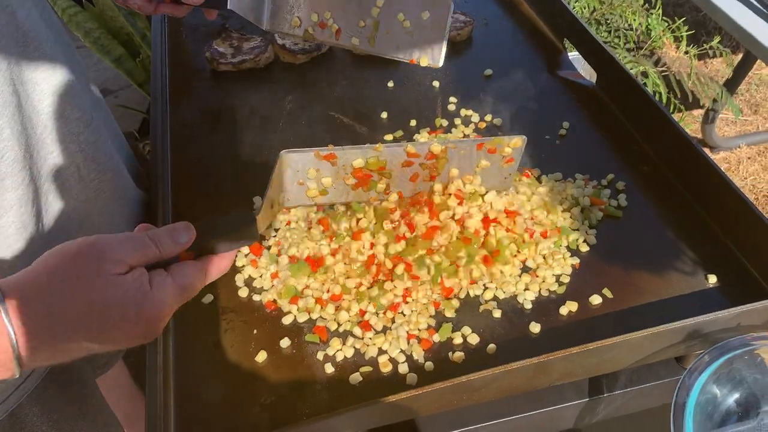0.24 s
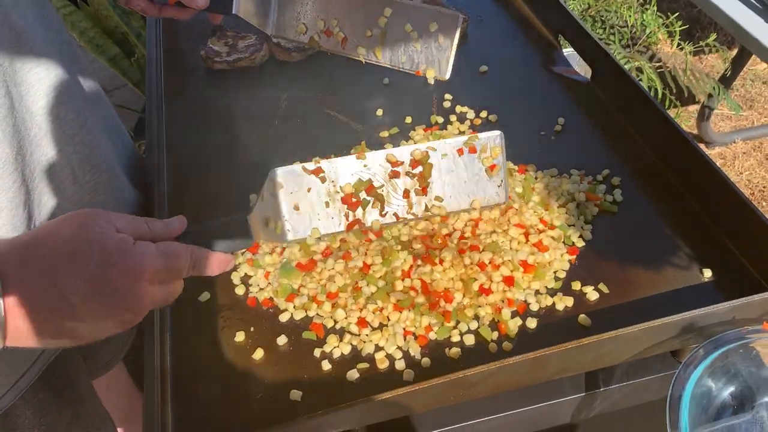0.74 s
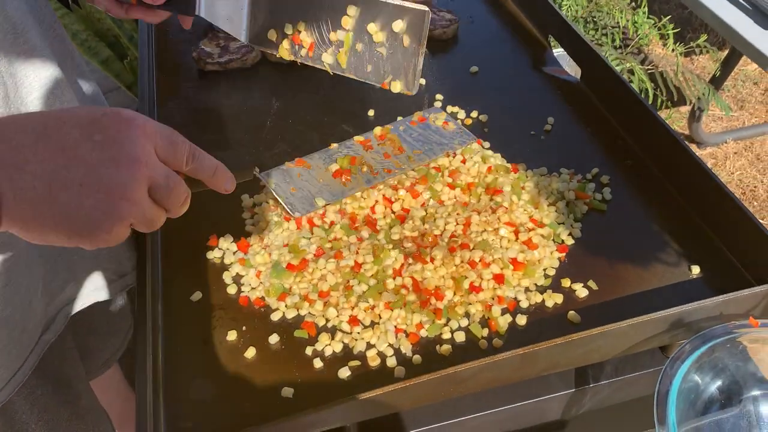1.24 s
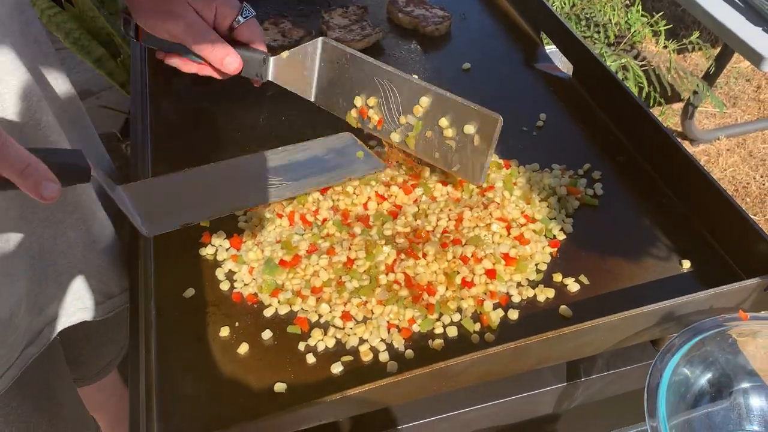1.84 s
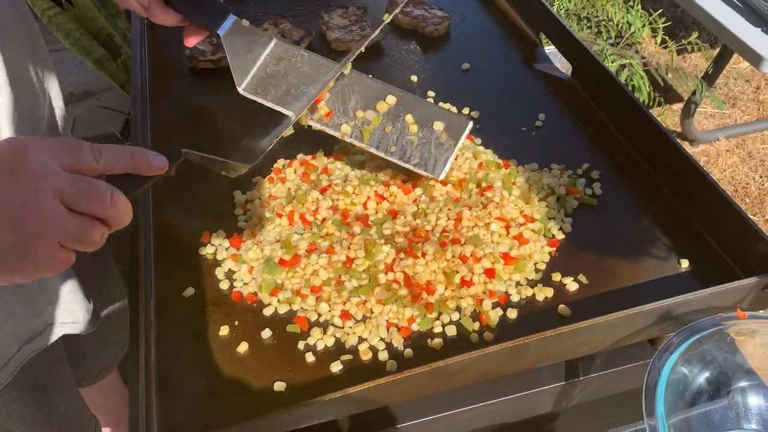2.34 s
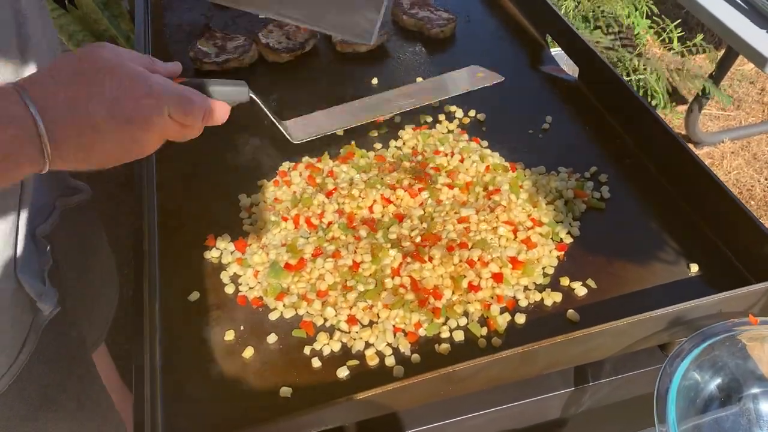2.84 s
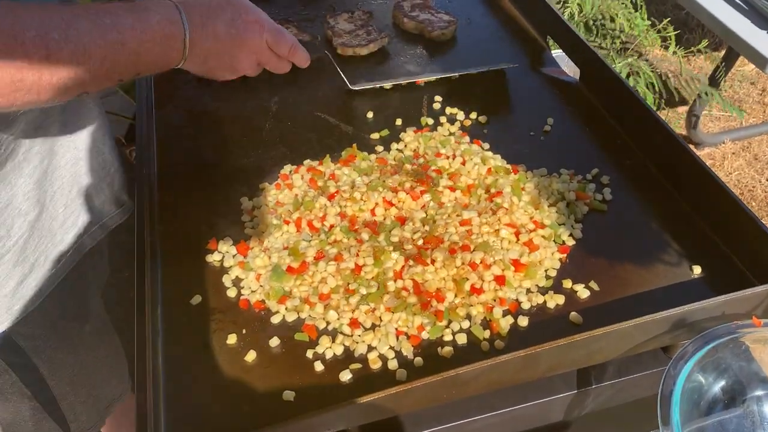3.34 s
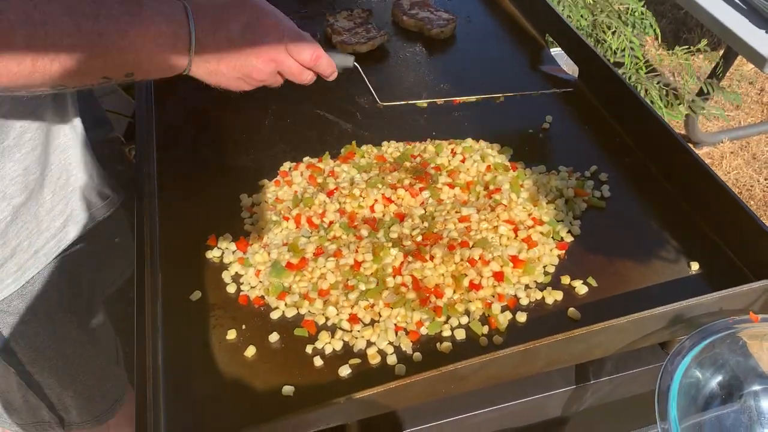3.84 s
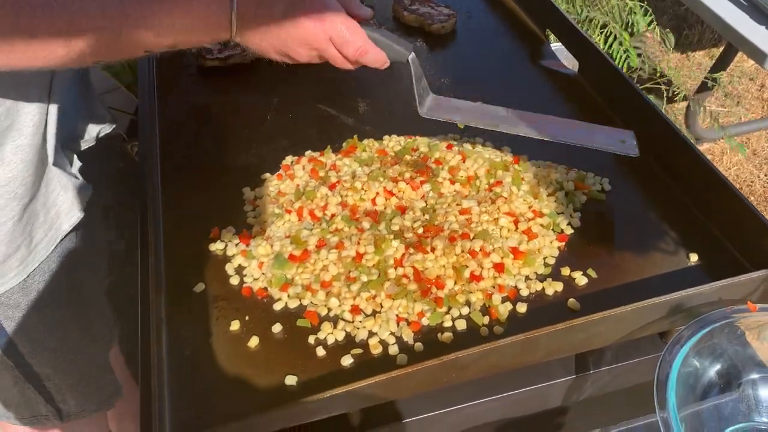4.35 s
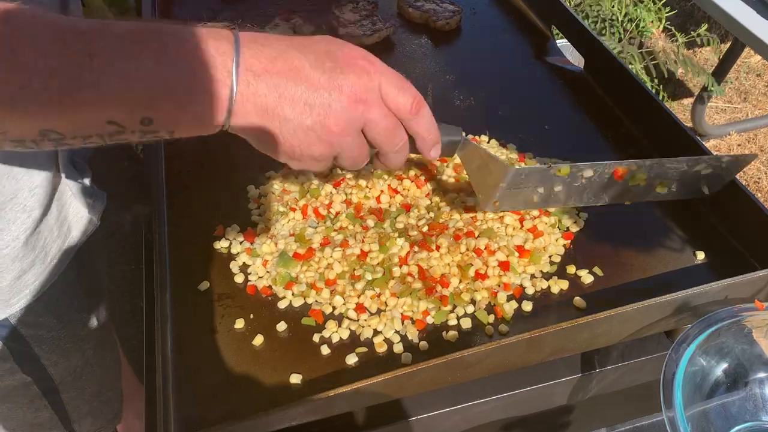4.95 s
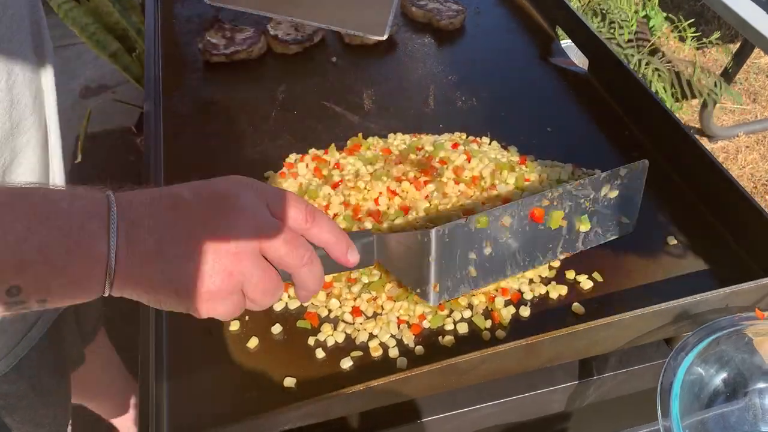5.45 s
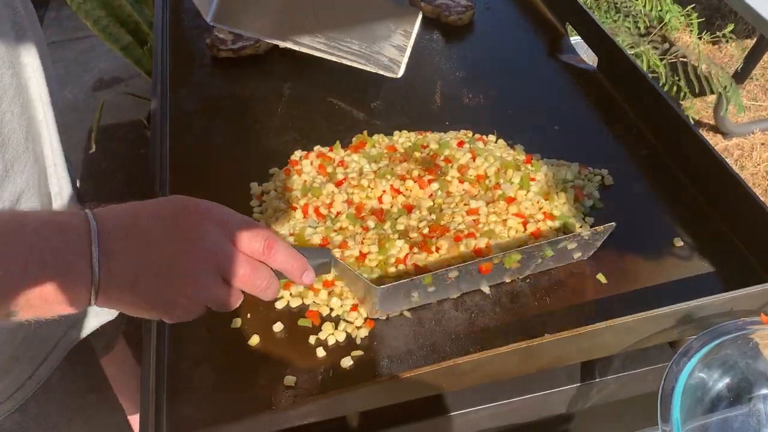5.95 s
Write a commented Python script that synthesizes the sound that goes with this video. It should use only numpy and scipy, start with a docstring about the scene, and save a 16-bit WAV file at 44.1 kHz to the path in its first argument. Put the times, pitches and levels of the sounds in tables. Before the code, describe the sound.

Metal spatulas knock and scrape across a hot steel griddle over a crackling sizzle, with bursts of wind rumble on the microphone.

```python
"""A steady sizzle, with spits of fat: diced vegetables fry on an outdoor steel griddle.
Bursting steam bubbles make the hiss and crackle. Steel spatulas knock and scrape across the plate:
each stroke lands with a clank, drags with a gritty hiss and rings on as the blade lifts.
Gusts of wind buffet the small stereo microphone with rumble, flutter and thumps."""
import sys
import numpy as np
from scipy import signal
from scipy.fft import rfft, irfft, next_fast_len
from scipy.io import wavfile
from scipy.ndimage import uniform_filter1d, minimum_filter1d

SR = 44100
rng = np.random.default_rng(int(sys.argv[2]) if len(sys.argv) > 2 else 0)


def to_wav(s):
    """Save 16-bit WAV."""
    ch = np.atleast_2d(s).T  # columns
    pcm = np.round(np.clip(ch, -1, 1) * 32767)  # PCM
    wavfile.write(sys.argv[1], SR, pcm.astype(np.int16))


N = 273751

# Each row: time in seconds, level in dB, extra treble in dB.
FRYING_LEVEL = [(0, -25.5, 0.5), (.2, -24.5, -0.5), (.29, -23, 4.5), (.42, -24, 1), (.64, -24.5, 1.5),
                (.75, -27, -1), (1.48, -28, -0.5), (1.68, -27, -2.5), (2.8, -28, -1), (3.3, -26.5, -1),
                (3.7, -29.5, 0.5), (4.1, -23, -7), (4.3, -27, -9), (4.82, -29.5, -2.5), (5.36, -29, -7),
                (6.21, -29.5, -5)]
# Each row: frequency in Hz, spectral density in dB.
FRYING_SPECTRUM = [(290, -11.5), (500, -21), (868, -13.5), (1190, -9), (1770, -14.5), (1950, -10),
                   (3750, -9), (4150, -9.5), (4660, -8), (5470, -8), (8330, -3.5), (14500, -2), (16000, 0)]
# Each row: frequency in Hz, left-right correlation.
FRYING_CORRELATION = [(60, 0.95), (130, 0.59), (290, 1), (640, 0.81), (1410, 0.74), (3100, 0.31),
                      (6820, 0.1), (10000, 0.95), (15000, 0.62)]
# Each row: frequency in Hz, left over right in dB.
FRYING_PAN = [(60, -3), (110, -2), (200, -9), (380, 8), (700, -2), (1290, 1), (2380, 1), (4400, 1.5),
              (8120, 4), (15000, -1.5)]
def sizzle():
    """Countless steam bubbles burst into a flickering hiss; larger ones crackle."""
    crackles_per_s, crackle_db, calm_db = 600, -19.5, -27
    level_db, treble_db = curves(FRYING_LEVEL)
    hiss = stereo_noise(FRYING_CORRELATION) * gain_of(1.14 * wander(40) + 1.1 * wander(1300))
    bursts = gain_of(0.85 * np.minimum(rng.exponential(1, N), 6)) * (rng.random(N) < crackles_per_s / SR)
    crackle = evened(bursts * rng.choice([-1, 1], N)) * panned(5 * rng.standard_normal(N))
    fizz = coloured(hiss + gain_of(crackle_db) * crackle, FRYING_SPECTRUM)
    fizz = filtered(fizz, lambda hz: panned(value_at(FRYING_PAN, hz)))
    treble = signal.sosfilt(signal.butter(2, 5500, "high", fs=SR, output="sos"), fizz)
    sheen = signal.sosfiltfilt(signal.butter(2, [7950, 8700], "band", fs=SR, output="sos"), treble)
    sheen_db = -3 + 0.6 * (level_db - calm_db)
    treble = treble + (gain_of(sheen_db) - 1) * sheen
    return gain_of(level_db) * (fizz - treble) + gain_of(level_db + treble_db) * treble


# Each row: start in seconds, peak before panning and filtering in dB.
FAT_SPITS = [(0.2194, -15), (0.2862, -11), (0.3714, -14), (0.4344, -15), (0.5774, -13), (0.6324, -12),
             (0.9844, -16), (1.7074, -16), (3.2344, -22), (3.27, -13), (3.8694, -20), (6.0801, -19)]
def spitting_fat():
    """Fat spits in single sharp snaps, left of centre."""
    out, pan_db = np.zeros((2, N)), 5
    for start_s, db in FAT_SPITS:
        snap = rng.standard_normal(90) * np.exp(-np.arange(90) / 10)
        add(out, start_s, gain_of(db) * panned(pan_db) * snap / abs(snap).max())
    return coloured(out, FRYING_SPECTRUM)


STROKE_SAMPLES = 24576
# Each row: start in seconds, level in dB, rise in seconds, bass, rasp, treble and pan in dB, then the
# grip: three freely ringing pitches in Hz, their lift in dB, ring time as a multiple of the free blade's.
LANDINGS = [(1.508, -26.5, 0.0009, -3.5, 0, 9.5, 1, 2090, 5800, 8500, 7, 0.37),
            (1.5891, -18, 0.0018, -10.5, -5, -2, -0.5, 2166, 5260, 8170, 13, 0.59),
            (2.3207, -13, 0.0019, -7.5, 1, -4, 2, 2116, 4253, 6440, 7.4, 0.49),
            (3.2974, -14.5, 0.0021, -1, 2.5, -2, -0.5, 918.6, 1104, 7600, 15.4, 0.88),
            (4.0139, -14, 0.0063, 0, -14, -17, 1.5, 920, 2034, 4253, 12.7, 0.72),
            (4.5595, -11.5, 0.0018, -9, 0, -1, 1.5, 1880, 1200, 16000, 11.5, 0.83),
            (5.237, -6.5, 0.0023, -8, -8.5, -16, 0, 967, 2310, 3950, 7, 1),
            (5.7538, -12, .001, -8, -1, -3.5, 3, 1070, 2150, 8500, 3.7, 0.5)]
def spatula_clanks():
    """The blade lands with a tick and chatters briefly; it bounces once a moment later."""
    chatter_t60_s, bounce_db, bounce_s = 0.098, -20, 0.0177
    out, t = np.zeros((2, N)), np.arange(STROKE_SAMPLES) / SR
    for start_s, db, rise_s, bass_db, rasp_db, treble_db, pan_db, *grip in LANDINGS:
        tone_db = np.outer([bass_db, rasp_db, treble_db], np.ones(len(t)))
        blow = gain_of(db + 0.5 - 60 * t / chatter_t60_s) * np.minimum(t / rise_s, 1)
        bounce = gain_of(bounce_db) * np.interp(t - bounce_s, t, blow, left=0)
        force = (blow + bounce) * gain_of(1.32 * wander(88, len(t)))
        clank = blade_ring(force, tone_db, grip) + plate_grit(force, tone_db, grip)
        tick = np.diff(rng.standard_normal(401)) * np.exp(-t[:400] / 0.0049)
        add(out, start_s, clank * panned(pan_db))
        add(out, start_s, gain_of(db + treble_db + 2) * tick * panned(pan_db))
    return out


# Each row: time of greatest pressure, rise, hold and fall in seconds, level, bass, rasp, treble and pan
# in dB, the five grip values as in LANDINGS, ring on release in dB.
SCRAPES = [(1.699, 0.031, 0.016, 0.036, -43, -7, 0, 6, 2, 3000, 6050, 8400, 11, .67, -60),
           (1.78, 0.016, 0.043, 0.023, -36.5, -15, -7, 2.5, 1, 2950, 2300, 2674, 9.1, 0.92, -50),
           (1.854, 0.041, .03, 0.032, -43, -3.5, 8, 11, 2, 5240, 5860, 6200, 5.5, 1.2, -55),
           (2.519, 0.22, 0.095, 0.043, -32, -22, -1.5, 2.5, 1.5, 1948, 5230, 6400, 1.8, 1.3, -35.5),
           (3.46, 0.13, 0.041, 0.16, -23.5, -2, 2, 0, 0, 960, 1280, 5500, 2.8, 0.6, -45),
           (3.584, 0.074, 0.025, 0.1, -26.5, -3.5, -10, -2.5, -.5, 902, 1280, 1140, 3.3, 0.55, -39),
           (4.158, .07, 0.037, 0.13, -17.5, -10.5, 0.5, -4, 2.5, 950, 5500, 10400, 3.9, 0.95, -45),
           (4.645, .05, 0.044, 0.09, -28.5, -5, 0.5, -2.5, 1.5, 784, 1912, 10870, 14, 0.53, -26),
           (5.35, 0.084, 0.037, 0.074, -20.5, -5, -13, -9.5, 2, 938, 1116, 4253, 8.6, 0.72, -23),
           (5.92, .1, 0.024, 0.056, -34.5, 2, -5, -0.5, 0, 426, 1093, 2010, 7.6, 0.46, -41),
           (5.999, 0.055, 0.019, 0.065, -32, -2, -8, -7, 1, 429, 1110, 2226, 7.9, 0.76, -42)]
def spatula_scrapes():
    """The dragged edge catches and slips, duller under light pressure, then lifts and rings."""
    sag_db, faint_db = -3, -24.5
    tone_per_db = (-0.54, 0.3, 0.37)  # bass, rasp, treble per dB of pressure
    out, t = np.zeros((2, N)), np.arange(STROKE_SAMPLES) / SR
    for peak_s, rise_s, hold_s, fall_s, db, *colour_and_grip in SCRAPES:
        bass_db, rasp_db, treble_db, pan_db, *grip, release_db = colour_and_grip
        corners_s = np.cumsum([0, rise_s, hold_s, fall_s])
        pressure_db = np.interp(t, corners_s, [faint_db, 0, sag_db, faint_db], right=-99)
        dulling_db = np.outer(tone_per_db, np.maximum(pressure_db, faint_db))
        tone_db = np.array([[bass_db], [rasp_db], [treble_db]]) + dulling_db
        force = gain_of(db + pressure_db + 2.9 * wander(30, len(t)) + 1.25 * wander(500, len(t)))
        scrape = blade_ring(force, tone_db, grip) + plate_grit(force, tone_db, grip)
        add(out, peak_s - rise_s, scrape * panned(pan_db))
        add(out, peak_s + hold_s, blade_release(release_db, grip) * panned(pan_db))
    return out


# Each row: frequency in Hz, level in dB, free ring time (T60) in seconds.
BLADE_MODES = [(422, -0.5, 0.24), (488, -2.5, 1), (777, -7, 0.49), (916.5, 4.5, 0.72), (974, 4, 0.4),
               (1074, 3, 1), (1106, -4, 0.44), (1247, 3.5, 0.83), (1294, 4, 0.77), (1340, 4.5, 0.54),
               (1879, 0, .2), (1920, 1, 0.71), (1983, -1.5, 1), (2077, 3, 0.23), (2230, 1, 0.26),
               (2380, -1.5, 0.74), (2595, 0.5, 0.41), (3010, -2.5, 0.55), (3360, -8.5, 1), (3560, 1, 0.41),
               (3920, 0, 0.08), (4253, -1, .3), (5220, 9, 0.09), (5690, 5, 0.1), (6160, 3, 0.077),
               (6500, -15, 0.057), (8060, 0, 0.038), (8310, -0.5, 0.082), (10190, 3, 0.088),
               (11200, 5.5, 0.032)]
def blade_ring(force, tone_db, grip):
    """Steel rubbing on steel drives the blade's modes, each with its own left-right phase."""
    *_, lift_db, _ = grip
    friction, out = force * rng.standard_normal(len(force)), np.zeros((2, len(force)))
    for hz, db, free_t60_s in BLADE_MODES:
        freedom, t60_s = gripped_mode(hz, free_t60_s, grip)
        radius = 1000 ** (-1 / (t60_s * SR))
        pole = radius * np.exp(2j * np.pi * hz / SR)
        drive = friction * gain_of(tone_at(hz, *tone_db))
        ring = signal.lfilter([np.sqrt(1 - radius ** 2)], [1, -pole], drive)
        right = ring * np.exp(1j * rng.uniform(-1.54, 1.82))
        out += gain_of(db - 11 + lift_db * freedom) * np.array([ring.real, right.real])
    return out


def blade_release(db, grip):
    """As the blade lifts, its free modes swell quickly and die away as clean tones."""
    out, t = np.zeros(2 ** 15), np.arange(2 ** 15) / SR
    swell = 1 - np.exp(-t / 0.0025)
    for hz, mode_db, free_t60_s in BLADE_MODES:
        freedom, t60_s = gripped_mode(hz, free_t60_s, grip)
        tone = np.sin(2 * np.pi * hz * t + rng.uniform(0, 2 * np.pi))
        out += freedom * gain_of(db + mode_db - 60 * t / t60_s) * swell * tone
    return out


def gripped_mode(hz, free_t60_s, grip):
    """How free a mode is (0 to 1), and its ring time once hand and food have damped it."""
    *free_hz, _, ring_scale = grip
    freedom = nearness(hz, free_hz, spread=0.022)
    return freedom, free_t60_s * ring_scale * (0.35 + 0.65 * freedom)


# Each row: frequency in Hz, spectral density in dB.
PLATE_SPECTRUM = [(290, -58), (500, -51), (649, -25), (729, -8.5), (1280, -3.5), (1600, -5), (2070, -4),
                  (5390, -3), (7210, -8), (10400, 1.5), (16000, -18)]
def plate_grit(force, tone_db, grip):
    """The plate's crowded modes rasp, flaring in narrow bands that come and go as the edge moves."""
    *free_hz, lift_db, _ = grip
    friction = force * stereo_noise([(1000, 1.0), (4000, 0.15), (10000, 0.72)], len(force))
    hz, frame_s, frames = signal.stft(coloured(friction, PLATE_SPECTRUM), SR, nperseg=512, noverlap=384)
    frame_at = np.minimum(np.round(frame_s * SR).astype(int), len(force) - 1)
    bands = uniform_filter1d(rng.standard_normal(frames.shape[1:]), size=2, axis=0)
    flare_db = 5 * evened(uniform_filter1d(bands, size=14, axis=1))
    grip_db = 1.05 * lift_db * nearness(hz, free_hz, spread=0.041)[:, None]
    colour_db = tone_at(hz[:, None], *tone_db[:, frame_at]) + grip_db + flare_db
    _, grit = signal.istft(frames * gain_of(colour_db), SR, nperseg=512, noverlap=384)
    return gain_of(-0.5) * grit[:, :len(force)]


# Each row: start in seconds, level in dB, pitch in Hz, snap in dB, surrounding flutter in dB.
WIND_BUFFETS = [(2.402, -10.5, 123, -31.5, -48), (2.447, -14, 147, -36, -30), (2.683, -5, 109, -19.5, -22),
                (2.72, -20, 78.6, -20, -15.5), (3.063, -14, 82, -23, -23.5), (3.103, -8, 123, -48, -30),
                (4.501, -14.5, 145, -34.5, -31.5), (4.541, -3.5, 128, -39, -20),
                (4.641, -19, 130, -43, -23), (4.828, 3, 140, -22, -9), (4.884, -11, 166, -24, -22),
                (4.923, -5, 194, -28, -20), (4.944, -0.5, 76.5, -23, -16), (4.986, -3.5, 189, -28, -12),
                (5.065, -12, 87.5, -26, -21), (5.325, -18, 150, -38, -18.5), (5.499, -14.5, 92, -36, -36)]
def wind_thumps():
    """Sharp buffets hit the microphone: a low thump that falls in pitch, with a short snap."""
    out, t = np.zeros((2, N)), np.arange(1800) / SR
    snap_band = signal.butter(3, [450, 1250], "band", fs=SR, output="sos")
    for start_s, db, hz, snap_db, _ in WIND_BUFFETS:
        bend = 1 + 0.37 * np.exp(-t / 0.0042)
        thump = gain_of(db - 3) * np.sin(2 * np.pi * hz * t * bend) * np.exp(-t / 0.017)
        snap = signal.sosfilt(snap_band, rng.standard_normal(len(t)) * np.exp(-t / 0.0016))
        add(out, start_s, (thump + gain_of(snap_db + 15.5) * snap) * panned(0.25))
    return out


# Each row: time in seconds, level in dB.
WIND_LEVEL = [(0, -51.5), (2.0, -46.5), (2.2, -42), (2.3, -26.5), (2.36, -30.5), (2.44, -13.5),
              (2.56, -30.5), (2.7, -17), (2.9, -31), (2.96, -19), (3.01, -25), (3.09, -16.5), (3.18, -40),
              (3.58, -37.5), (3.68, -54), (3.82, -32.5), (4.47, -29.5), (4.52, -15.5), (4.76, -22.5),
              (4.95, -24.5), (5.2, -18.5), (5.3, -26), (5.36, -28), (5.45, -29.5), (5.54, -25.5),
              (5.72, -33), (5.79, -46), (6.09, -49), (6.21, -33)]
# Each row of both spectra: frequency in Hz, spectral density in dB.
RUMBLE_SPECTRUM = [(15, -57), (40, -1.5), (70, 5.5), (130, 0), (220, -7.5), (400, -40.5)]
FLUTTER_SPECTRUM = [(100, -25.5), (250, 1), (450, -3.5), (800, -20), (1500, -33), (2600, -38), (5000, -100)]
def wind_gusts():
    """Wind on the ports makes a lumpy rumble; a quicker flutter grows with it and around each buffet."""
    breeze_db, breeze_flutter_db, flutter_per_db = -37, -48.5, 0.9152
    rise_s, fall_s = 0.011, 0.015
    level_db, = curves(WIND_LEVEL)
    flutter_gain = gain_of(breeze_flutter_db + flutter_per_db * (level_db - breeze_db))
    for start_s, *_, flutter_db in WIND_BUFFETS:
        since_s = np.arange(N) / SR - start_s
        flutter_gain += gain_of(flutter_db) * np.exp(-np.maximum(since_s / fall_s, -since_s / rise_s))
    rumble = coloured(stereo_noise([(50, 0.93), (300, 0.9)]), RUMBLE_SPECTRUM)
    rumble *= gain_of(2.5 * wander(710))
    swirl = stereo_noise([(200, 1.0), (700, 0.3)]) * gain_of(4.6 * wander(112))
    flutter = coloured(swirl, FLUTTER_SPECTRUM)
    return gain_of(level_db) * evened(rumble) + flutter_gain * evened(flutter) * panned(-1.6)


def gain_of(db):
    return 10 ** (np.asarray(db) / 20)


def evened(x):
    """Scales to unit RMS."""
    return x / np.sqrt(np.mean(x ** 2) + 1e-20)


def panned(left_over_right_db):
    return gain_of(np.vstack([left_over_right_db / 2, -left_over_right_db / 2]))


def add(mix, start_s, sound):
    part = mix[:, round(start_s * SR):][:, :sound.shape[-1]]
    part += sound[..., :part.shape[1]]


def value_at(points, hz):
    """Interpolates (Hz, value) points over log frequency."""
    point_hz, values = np.transpose(points)
    return np.interp(np.log(hz + 1), np.log(point_hz + 1), values)


def curves(rows):
    """Each column after the time as a value per sample."""
    times_s, *columns = np.transpose(rows)
    return [np.interp(np.arange(N) / SR, times_s, column) for column in columns]


def filtered(x, response):
    """Applies a gain given as a function of Hz."""
    size = next_fast_len(x.shape[-1])
    return irfft(rfft(x, size) * response(np.fft.rfftfreq(size, 1 / SR)), size)[..., :x.shape[-1]]


def coloured(x, spectrum):
    """Filters by (Hz, dB) points, keeping the power of white noise."""
    return filtered(x, lambda hz: evened(gain_of(value_at(spectrum, hz))))


def wander(width_samples, size=N):
    """Smooth random drift of unit RMS."""
    drift = uniform_filter1d(rng.standard_normal(size), width_samples)
    return evened(uniform_filter1d(drift, width_samples))


def stereo_noise(correlation, size=N):
    """Two white noises, alike according to (Hz, correlation) points."""
    fft_size = next_fast_len(size)
    left, other = rfft(rng.standard_normal((2, fft_size)))
    shared = value_at(correlation, np.fft.rfftfreq(fft_size, 1 / SR))
    right = shared * left + np.sqrt(1 - shared ** 2) * other
    return irfft(np.array([left, right]), fft_size)[:, :size]


def tone_at(hz, bass_db, rasp_db, treble_db):
    """Three-band tone control in dB, flat between bass and rasp."""
    over_bass, over_mid, over_rasp = [1 / (1 + (edge / (hz + 1)) ** 16) for edge in (1500, 4600, 7000)]
    return bass_db * (1 - over_bass) + rasp_db * (over_mid - over_rasp) + treble_db * over_rasp


def nearness(hz, free_hz, spread):
    """1 at one of the free pitches, 0 far from all."""
    return np.max([np.exp(-(np.log((hz + 1) / f) / spread) ** 2) for f in free_hz], 0)


def scene():
    return sizzle() + spitting_fat() + wind_gusts() + wind_thumps() + spatula_clanks() + spatula_scrapes()


# Each row: frequency in Hz, gain in dB.
PORT_RESPONSE = [(7000, 0.5), (7900, -3), (8050, 6), (8600, 1.5), (9500, -0.5)]
# Each row: frequency in Hz, phase lead of the left port in radians.
PORT_PHASE = [(300, 0), (1380, -0.5), (3010, -1.5), (4800, -2.1), (5700, -5.2), (8500, -6.8), (10300, -6.6),
              (16500, -7.5)]
def record(dry):
    """The two ports resonate near 8 kHz and differ in phase; a peak limiter and a low-pass follow."""
    ceiling, limiter_samples, cutoff_hz = 0.88, 441, 15750
    heard = filtered(dry, lambda hz: gain_of(value_at(PORT_RESPONSE, hz)))
    heard = filtered(heard, lambda hz: np.exp(1j * np.outer([1, 0], value_at(PORT_PHASE, hz))))
    safe_gain = np.minimum(ceiling / (abs(heard).max(0) + 1e-9), 1)
    heard *= uniform_filter1d(minimum_filter1d(safe_gain, limiter_samples), limiter_samples)
    low_pass = signal.firwin(511, cutoff_hz, window=("kaiser", 9), fs=SR)
    return signal.oaconvolve(heard, low_pass[None], "same")


dry = scene()
out = record(dry)
to_wav(out)
```